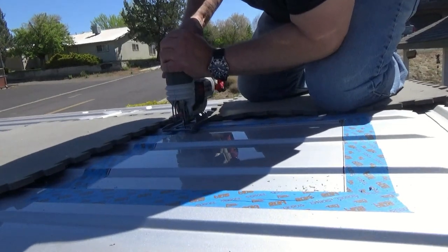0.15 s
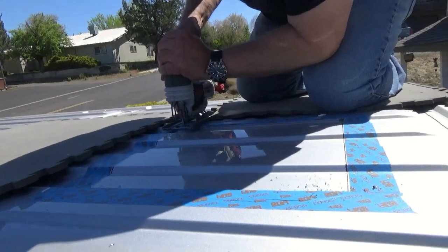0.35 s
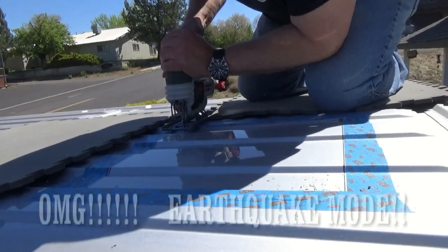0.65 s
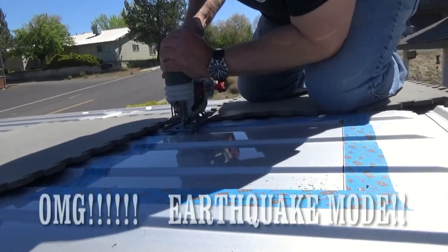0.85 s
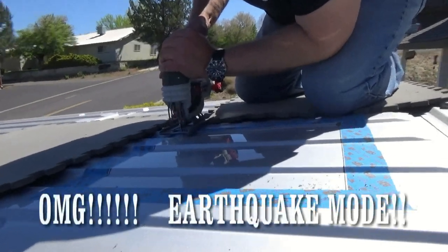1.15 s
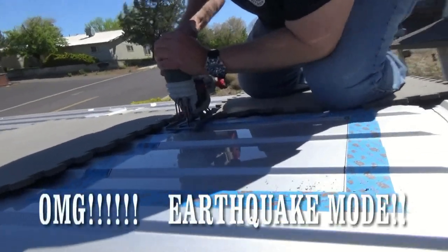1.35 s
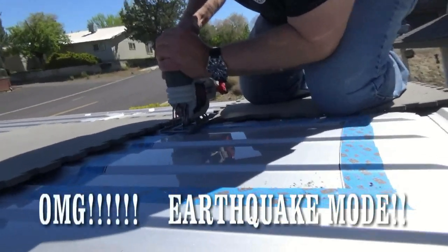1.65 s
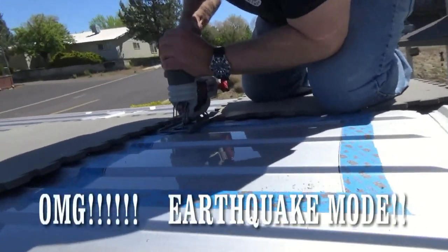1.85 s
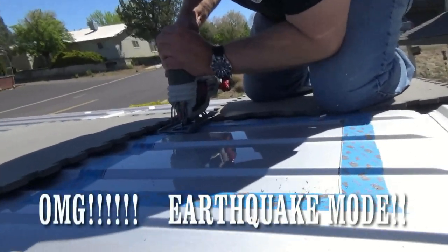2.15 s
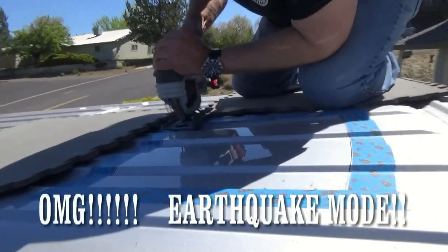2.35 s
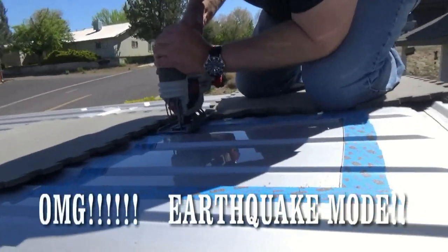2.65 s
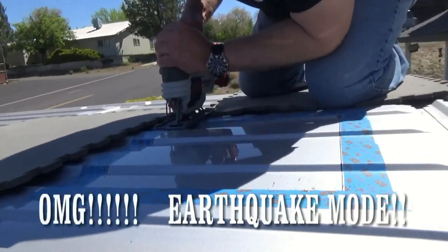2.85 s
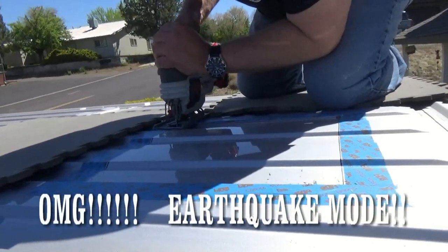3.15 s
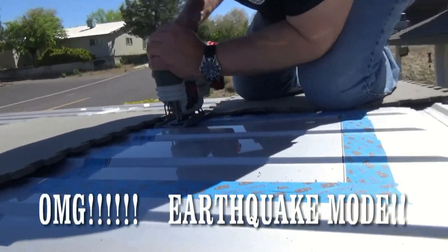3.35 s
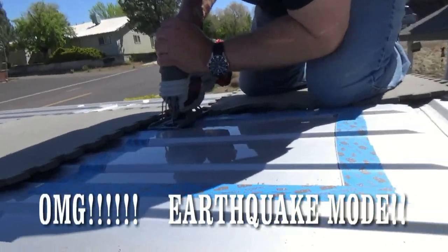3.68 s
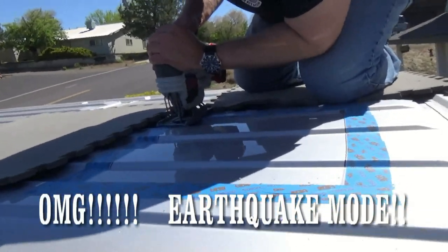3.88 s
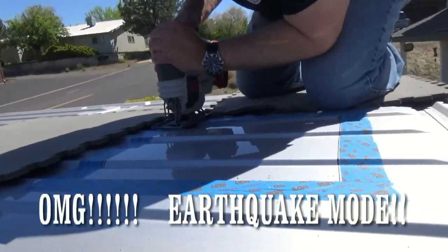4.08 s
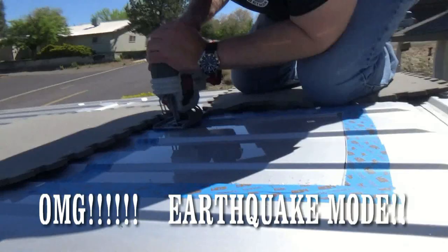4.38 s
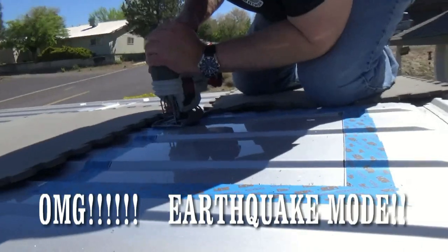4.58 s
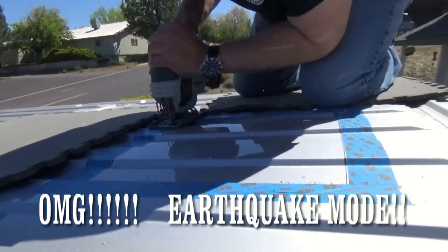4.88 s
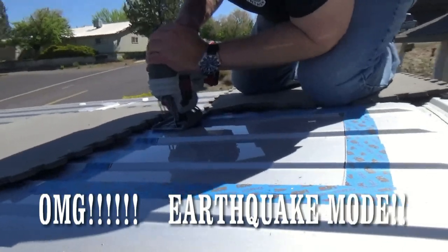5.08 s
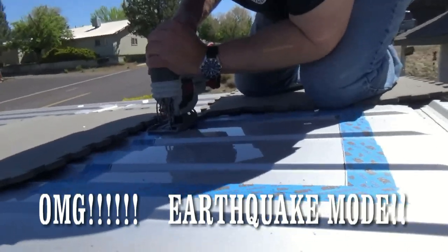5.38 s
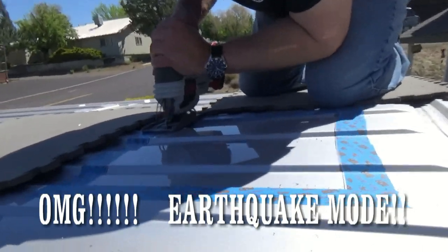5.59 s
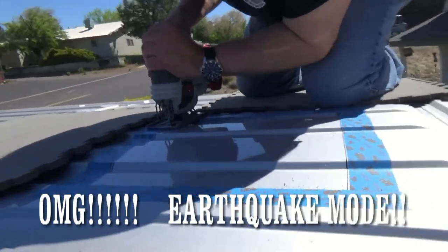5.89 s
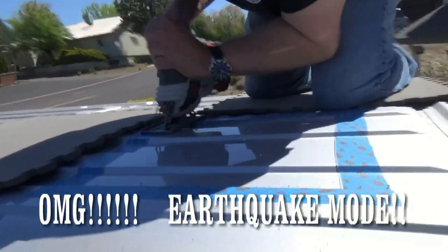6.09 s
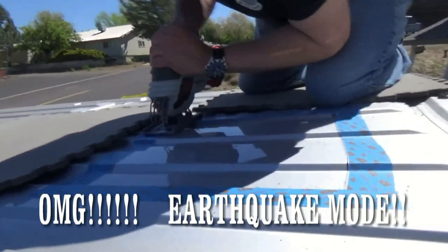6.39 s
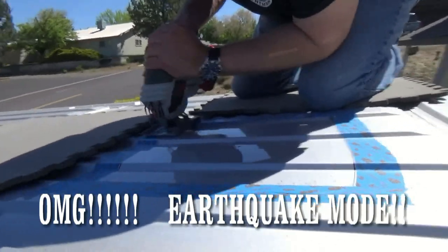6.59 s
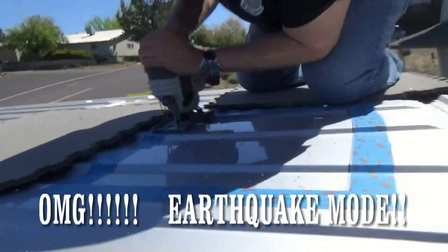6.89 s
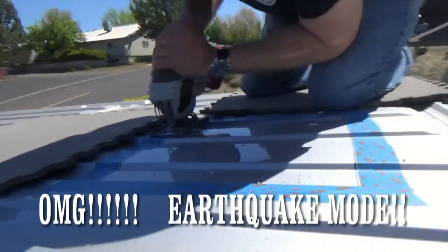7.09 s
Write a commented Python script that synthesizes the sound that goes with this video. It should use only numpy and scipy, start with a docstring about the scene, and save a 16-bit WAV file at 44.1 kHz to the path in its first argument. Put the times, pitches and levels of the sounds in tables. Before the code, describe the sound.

A jigsaw buzzes through thin sheet metal outdoors: two short yelping bursts, a long rasping cut, a brief pause, then another long cut.

```python
"""A jigsaw cuts a sheet-metal roof: two short bursts, a long cut, a pause, another long cut to the end.
Every blade stroke bites and rasps in nearly the same way: gritty noise, part of it repeated each stroke,
is shaped by the bite and coloured into rasp, sizzle, hiss, flap and boom. Gears whine on multiples of the
stroke rate, resonances squeal and the blade yelps as it catches. The switch clicks, a dull whirr stays
between the cuts, and the panel rings on briefly when the trigger is let go."""
import sys
import numpy as np
from scipy import signal
from scipy.fft import rfft, irfft, next_fast_len
from scipy.io import wavfile
from scipy.ndimage import uniform_filter1d

SR = 44100
rng = np.random.default_rng(int(sys.argv[2]) if len(sys.argv) > 2 else 0)


def transcribe(u):
    """Save the signal u as a 16-bit wav file named by the first command-line argument.

    u: samples, shape (n,) or (channels, n), limited to [-1, 1]; the rate is SR.
    q: integer samples, one column per channel.
    """
    v = np.clip(np.atleast_2d(u).T, -1, 1)
    q = np.round(v * 32767).astype(np.int16)
    wavfile.write(sys.argv[1], SR, q)


N = 319010
T = np.arange(N) / SR
FREE_STROKES_PER_S = 39.5  # unloaded blade

# Pulls of the trigger. Each row: click in seconds, click level in dB before its filter, blade bites in seconds,
# share of a stroke done at the bite, spin-up level in dB against the cut, trigger let go in seconds,
# blade stops in seconds, coasting level in dB.
CUTS = [(.0204, -15, .045, .3, -16, .16, .2, -42), (.3433, -18.5, .374, .3, -14, .5, .51, -45),
        (.618, -26, .652, .54, -6, 2.74, 2.955, -55), (3.1725, -36, 3.231, .2, -8, 7.3, 7.3, -54)]


def undb(db):
    """Amplitude factor of a level in dB."""
    return 10 ** (np.asarray(db) / 20)


def unit(x):
    """Scale to rms 1."""
    return x / np.sqrt(np.mean(x ** 2))


def colour(x, points):
    """Filter by (Hz, dB) points, joined over log frequency; rms 1."""
    size = next_fast_len(N)
    hz = np.arange(size // 2 + 1) * SR / size + 1
    point_hz, point_db = np.transpose(points)
    gain_db = np.interp(np.log(hz), np.log(point_hz), point_db, left=-80, right=-80)
    return unit(irfft(rfft(x, size) * undb(gain_db), size)[:N])


def walk(rate_hz):
    """Random levels held 1 / rate_hz s and slewed twice; spread near 1."""
    hold = int(SR / rate_hz)
    steps = np.repeat(rng.standard_normal(N // hold + 1), hold)
    return 1.25 * uniform_filter1d(uniform_filter1d(steps, hold), hold)[:N]


def resonate(x, hz, width_hz):
    """One resonance driven by x."""
    return signal.lfilter(*signal.iirpeak(hz, hz / width_hz, SR), x)


def swell(place, db, at):
    """Gain cycling once a stroke, +0.5 db at share `at` of the stroke and -1.5 db half a stroke away."""
    return undb(db * (np.cos(2 * np.pi * (place - at)) - .5))


def coasting():
    """A dull whirr of coloured noise that stays between the cuts, nearly the same on both sides."""
    # Each row: frequency in Hz, relative level in dB per Hz.
    coast = [(60, -12), (350, -10), (550, -9), (780, -9), (920, -2), (1130, -10), (1700, -13), (3600, -22),
             (15000, -37)]
    level_db = np.interp(T, [cut[-2] for cut in CUTS], [cut[-1] for cut in CUTS])
    mid, side = (colour(rng.standard_normal(N), coast) for _ in range(2))
    return undb(level_db + 2.5 * walk(27)) * (mid + 0.15 * side * np.array([[1], [-1]]))


def trigger():
    """Small plastic clicks of the switch: decaying noise, band-limited."""
    out = np.zeros(N)
    tick_s = np.arange(400) / SR
    for click_s, db, *_ in CUTS:
        i = int(click_s * SR)
        out[i:i + 400] += undb(db) * rng.standard_normal(400) * np.exp(-tick_s / 0.0014)
    return signal.sosfilt(signal.butter(2, [2600, 11000], "band", fs=SR, output="sos"), out)


def ring(x):
    """The panel rings on in decaying bands of noise, differently at each microphone."""
    # Each row: centre in Hz, decay by 60 dB in seconds, relative level in dB.
    ring_bands = [(416, 0.31, -12), (906, 0.22, -4), (3060, 0.12, -8.5), (5900, 0.26, -27),
                  (12100, 0.092, -38)]
    side_share = 0.64  # differs between the microphones
    t, tail = T[:SR // 2], 0
    for hz, t60_s, db in ring_bands:
        edges_hz = [hz / 2.18, min(hz * 2.06, .45 * SR)]
        band = signal.butter(3, edges_hz, "band", fs=SR, output="sos")
        noise = signal.sosfilt(band, rng.standard_normal((2, len(t))))
        decay = noise * np.exp(-np.log(1000) * t / t60_s)
        tail = tail + undb(db) * decay / np.sqrt(t60_s * SR / 14)
    stereo_tail = tail[0] + side_share * tail[1] * np.array([[1], [-1]])
    return signal.fftconvolve(x[None], stereo_tail, axes=1)[:, :N]


def motor():
    """Strokes per second, stroke count, strokes/s lost to load and to braking, and the on-off gain."""
    # Speed the motor can hold under the load of the cut. Each row: time in seconds, strokes per second.
    loaded_speed = [(0, 28), (.7, 34.09), (.95, 35.91), (1.07, 39.24), (1.57, 39.49), (1.9, 38.62),
                    (2.5, 39.01), (3.55, 38.75), (4.02, 39.28), (4.2, 38.13), (4.38, 34.45), (4.55, 37.9),
                    (4.72, 38.22), (4.97, 39.15), (5.15, 38.44), (5.35, 39.18), (6.0, 38.81), (6.12, 39.45),
                    (6.53, 39.13), (6.79, 38.35), (7.02, 36.31), (7.23, 37.17)]
    spin_s, spin_share = .06, .65  # share of speed reached at the bite
    brake_per_s2 = 88  # strokes/s lost per second
    switch_lag_s, stop_s = .018, .014
    click, _, bite, crank, spin_db, release, stop, _ = np.transpose(CUTS)
    start = click + switch_lag_s
    cut = np.clip(np.searchsorted(start, T) - 1, 0, None)
    loaded = np.interp(T, *np.transpose(loaded_speed))
    braked = brake_per_s2 * np.clip(T - release[cut], 0, None)
    spun = 1 - (1 - spin_share) * np.exp(-(T - bite[cut]) / spin_s)
    speed = np.clip(loaded * spun - braked, 1, None)
    turn = np.cumsum(speed) / SR
    # each cut bites at its own point of the stroke
    turn += cut + ((crank - np.interp(bite, T, turn)) % 1)[cut]
    run = 0
    for s, on, db, off in zip(start, bite, spin_db, stop):
        times = [s, s + 0.0064, on - .005, on, off, off + stop_s]
        run = run + np.interp(T, times, [0, undb(db), undb(db), 1, 1, 0])
    return speed, turn, FREE_STROKES_PER_S - loaded, np.minimum(braked, FREE_STROKES_PER_S), run


def teeth(turn, same, hold, grit_db):
    """Gritty tooth force: one part repeats each stroke and changes over `hold` strokes, the rest is new."""
    def grit(*shape):
        burst = np.minimum(rng.exponential(size=shape), 3.5)
        return rng.standard_normal(shape) * undb(grit_db * burst)
    size = 1024
    age, place = turn / hold, (turn % 1 * size).astype(int)
    row = age.astype(int)
    pattern = unit(grit(int(age.max()) + 2, size))
    fade = np.pi / 2 * (age % 1)
    again = np.cos(fade) * pattern[row, place] + np.sin(fade) * pattern[row + 1, place]
    same = np.clip(same, 0, 1)
    return np.sqrt(same) * again + np.sqrt(1 - same) * unit(grit(N))


def panel_flap(turn, same):
    """The sheet snaps once a stroke and shudders with the teeth."""
    # Each row: frequency in Hz, relative level in dB per Hz.
    flap = [(25, -38), (80, -22), (115, -7), (230, 0), (280, -16), (380, -28)]
    slap = unit(np.diff(np.floor(turn), prepend=0).clip(0, 1))
    return colour(slap + 0.66 * teeth(turn, same, 8.3, 0.6), flap)


def panel_boom(turn, same, bite_db):
    """The panel booms low under the tooth force, following the bite weakly."""
    # Each row: frequency in Hz, relative level in dB per Hz.
    boom = [(230, -20.5), (300, -4.5), (345, 3), (410, -7), (560, -9.5), (720, -7.5), (900, -10.5)]
    return colour(teeth(turn, same + 0.05, 14, 0.95) * undb(0.28 * bite_db + 1.6 * walk(12)), boom)


def blade_rasp(force, slack, bite_db, rough_db):
    """Tooth force shaped by the bite, which a slack panel smears."""
    # Each row: frequency in Hz, relative level in dB per Hz.
    rasp = [(250, -23.5), (500, -11.5), (760, -7.5), (1300, 1), (2200, -0.5), (3400, -1), (4500, -15),
            (6000, -16.5), (8000, -31)]
    sharpness = 0.49 * (2 - .3 * slack ** 2)
    return colour(force * undb(sharpness * bite_db + rough_db), rasp)


def chip_sizzle(turn, same, bite_db, rough_db):
    """Chips sizzle and excite the high modes of the blade."""
    # Each row: frequency in Hz, relative level in dB per Hz.
    sizzle = [(3500, 0), (4300, 10), (5200, 5), (6200, 3.5), (8300, 7), (9300, 7.5), (10500, -4)]
    # Each row: frequency in Hz, width in Hz, relative level in dB.
    blade_modes = [(6390, 110, -3.5), (6900, 100, 0), (7680, 130, -1.5), (8230, 160, 5.5),
                   (8570, 160, -6.5), (9420, 170, -1.5), (12900, 110, -1), (12400, 150, 4),
                   (14200, 350, 5.5)]
    blade_db = -8  # against the sizzle
    chips = teeth(turn, 0.18 * same, 4.6, 1.6) * undb(bite_db + 0.49 * rough_db)
    blade = 0
    for hz, width_hz, db in blade_modes:
        blade = blade + undb(db + 3.0 * walk(2.5)) * unit(resonate(chips, hz, width_hz))
    return colour(chips, sizzle) + undb(blade_db) * unit(blade)


def chip_hiss(turn, same, bite_db):
    """The finest, mostly unrepeated grit hisses with the bite."""
    # Each row: frequency in Hz, relative level in dB per Hz.
    hiss = [(8500, -3.5), (9800, -0.5), (11500, -3.5), (13500, -5), (15000, -13), (16500, -19)]
    return colour(teeth(turn, 0.13 * same, 2.2, 6.3) * undb(1.02 * bite_db), hiss)


def gear_whine(turn, place):
    """Gear tones through the housing; the load of each stroke swings the shaft ahead and behind."""
    # Each row: multiple of the stroke rate, relative level in dB.
    gears = [(24, -4), (28, -5), (34, 1), (39, -8), (42, 2), (45, -7)]
    # Gear housing. Each row: frequency in Hz, gain in dB.
    housing = [(500, -22), (850, -5), (1250, 0), (1750, 0), (2400, -12)]
    # Each row: time in seconds, share of the stroke at which the whine is loudest.
    gear_place = [(1.2, 0.72), (2.7, 0.39), (2.82, 0.057), (3.3, 0.13), (3.5, 0.39), (4.1, 0.25),
                  (5.0, 0.31)]
    swing_strokes, throb_db = .003, 8
    tones = 0
    for order, db in gears:
        swing_phase, tone_phase = rng.random(2)
        angle = turn + swing_strokes * np.sin(2 * np.pi * (turn + swing_phase))
        tones = tones + undb(db + 1.55 * walk(6.37)) * np.sin(2 * np.pi * (order * angle + tone_phase))
    loudest_at = np.interp(T, *np.transpose(gear_place))
    return colour(unit(tones), housing) * swell(place, throb_db, loudest_at)


def squeals(force, bogged, place):
    """The tooth force rings whichever resonance is free at the moment."""
    # Modes of sheet and blade, each free over one stretch. Each row: frequency in Hz, width in Hz,
    # level in dB before the swell, middle in seconds, half length in seconds,
    # share of the stroke where the swell peaks (dips if negative), swell in dB.
    modes = [(930, 160, -13.5, 4.4, 0.15, 0.14, -2), (800, 530, -10.5, .25, 0.21, 0.098, 13),
             (1134, 60, -18, 5.87, 0.79, 0.35, -4), (1330, 150, -15, 4.07, 0.93, 0.32, -5.5),
             (1916, 170, -12, 5.85, 0.88, 0.2, 11), (2683, 260, -8, 1.84, 0.88, 0.047, 3),
             (233, 15, -26, 5.2, 0.37, 0.36, 6), (3150, 160, -16.5, 6.1, 0.34, 0.11, 2),
             (2720, 290, -9, 4.68, 0.66, 0.36, 3.5), (2980, 33, -17, 3.53, 0.58, 0.26, 8),
             (3640, 160, -14.5, 5.8, 0.43, 0.2, 8), (4210, 69, -12.5, 5.2, 0.49, 0.063, 5),
             (5070, 200, -10.5, 3.88, 0.25, 0.022, 13), (5000, 92, -14.5, 4.96, 0.28, .05, 3),
             (6550, 110, -17.5, 4.9, 0.3, 0.042, 9.5), (2980, 300, -21, 2.02, 0.4, 0.64, 29),
             (2960, 500, -19.5, 6.95, 0.46, 0.49, 15)]
    screech_hz, screech_width_hz = 2670, 1600
    screech_db = -26.5  # at one stroke/s bogged down past the first

    def sing(x, hz, width_hz):
        tone = resonate(x, hz, width_hz)
        # divide by the running rms over 1/12 s, so each squeal keeps an even level
        return tone / np.sqrt(uniform_filter1d(tone ** 2, size=SR // 12))
    screech = sing(force, screech_hz, screech_width_hz)
    out = undb(screech_db) * np.clip(bogged - 1, 0, 4.5) * screech
    for hz, width_hz, db, middle_s, half_s, at, swell_db in modes:
        near = np.abs(T - middle_s) < 2 * half_s + .1
        stretch = np.exp(-((T[near] - middle_s) / half_s) ** 6)
        tone = sing(force[near], hz, width_hz) * swell(place[near], swell_db, at)
        out[near] += undb(db) * stretch * tone
    return out


def yelps():
    """Brief wavering tones as the blade catches, and the shape of the jolt that goes with each."""
    # Each row: start in seconds, frequency in Hz, length in seconds, peak level in dB against the cut.
    catches = [(.425, 1320, .025, 2), (.452, 1450, .05, 3), (.688, 1160, .016, 1), (.714, 1450, .022, 7),
               (.744, 1460, .016, 3), (.77, 1440, .024, 6), (.849, 1950, .007, 4), (.892, 2000, .01, 4),
               (.96, 1440, .024, 1), (.991, 1440, .022, 0), (1.02, 1460, .014, -2), (1.046, 1450, .02, -1),
               (2.858, 2050, .014, -2), (2.892, 2030, .016, -3), (2.938, 1670, .02, -2),
               (3.229, 2160, .016, -1), (4.303, 2750, .01, 1), (4.33, 2750, .012, 4), (4.36, 2800, .01, 2),
               (4.39, 2700, .008, 2), (4.418, 2750, .011, 4), (4.446, 2600, .01, 2), (.803, 2680, .009, 3)]
    wobble = 1 + .012 * walk(200)  # pitch scatter as a share
    tone, jolt = np.zeros(N), np.zeros(N)
    for start_s, hz, length_s, db in catches:
        i, size = int(start_s * SR), int(length_s * SR)
        shape = np.sqrt(np.sin(np.pi * (np.arange(size) / size) ** 0.63))
        cycles = hz * np.cumsum(wobble[i:i + size]) / SR
        tone[i:i + size] += undb(db) * shape * np.sin(2 * np.pi * cycles)
        jolt[i:i + size] = shape
    return tone, jolt


def saw():
    """All that sounds while the blade runs, driven by stroke position, bite and load."""
    # Course of the work. Each row: time in seconds, cut level in dB, slack of the panel 0-1, bite depth in dB
    # before stroke shaping, boom in dB against the cut level, rough scatter of the stroke timing in ms.
    work = [(.045, -19, 1, 7, -8, 0.66), (0.159, -18.5, 0.7, 4.5, -13.5, 0.63), (.2, -34.5, 0.1, -3, 1, .6),
            (.372, -18, 0.83, 2.5, -22, 0.59), (.515, -22.5, 0.53, 5, -1.5, 0.63),
            (.65, -25, 0.88, -2.5, -14, 0.77), (1.001, -21, 0.67, 1, -14, .6),
            (1.3, -17.5, 0.39, 5, -23, .22), (1.5, -17.5, 0.35, 5, -23, 0.13),
            (2.2, -17.5, 0.24, 6.5, -34, 0.043), (2.9, -17.5, 0.19, 5.5, -18.5, 0.055),
            (3.3, -17, 0.23, 7.5, -25, .09), (3.55, -17.5, 0.21, 7, -15, .16),
            (3.949, -18.5, 0.33, 7.5, -27, .1), (4.351, -17.5, 0.16, 5.5, -16, .25),
            (4.749, -17.5, 0.26, 8.5, -16.5, .1), (5.401, -18.5, 0.52, 5, -19.5, .16),
            (6.1, -18.5, 0.67, 9.5, -7.5, .12), (6.7, -15.5, 0.62, 7, -13.5, 0.19),
            (7.23, -16, 1, 8, -8, 0.79)]
    # Bite through one stroke. Each row: share of the stroke, multiplier of the bite depth.
    bite_shape = [(0, -0.61), (.2, -0.56), (.45, -0.75), (.62, -0.86), (.72, -1.61), (.9, 0.059),
                  (1, 0.061)]
    same_free, same_least, same_loss = 0.93, 0.27, 0.07  # likeness of strokes: full speed, floor, per stroke/s lost
    brake_depth_db = 0.4  # deeper bite per stroke/s braked away
    gear_brake_db, gear_bog_db = -.08, -2.2  # whine per stroke/s braked or bogged away
    bog_hiss_db = 0.07  # brighter chips per stroke/s bogged away
    chatter_db, yelp_knock_db = 3.5, 3  # unevenness of a rough cut; jump with each yelp

    speed, turn, bogged, braked, run = motor()
    same = np.clip(same_free - same_loss * (FREE_STROKES_PER_S - speed), same_least, 1)
    work_s, *columns = np.transpose(work)
    cut_db, slack, depth_db, boom_db, scatter_ms = (np.interp(T, work_s, c) for c in columns)

    def by_slack(taut_db, slack_db):
        return taut_db + slack * (slack_db - taut_db)
    # levels against the cut level, on a taut and on a slack panel
    flap_db, sizzle_db = by_slack(-39, -18), by_slack(-9, -3.5)
    hiss_db = by_slack(-17.5, -2.5) + bog_hiss_db * np.clip(bogged, 0, 5)
    gear_db = by_slack(3, -29) + gear_brake_db * braked + gear_bog_db * np.clip(bogged - 1, 0, 5)

    # strokes come a little early or late, which blurs the treble first
    turn = turn + scatter_ms / 1000 * speed * walk(45)
    place = (turn + .012 * walk(30)) % 1
    bite_db = (depth_db + brake_depth_db * braked) * np.interp(place, *np.transpose(bite_shape))
    bite_db += (.4 + 2.5 * (1 - same)) * walk(130)  # a rough cut knocks unevenly
    yelp, jolt = yelps()
    rough_db = chatter_db * (1 - same) * walk(45) + yelp_knock_db * jolt

    force = teeth(turn, same, 14, 0.84)
    mix = undb(-4.5) * blade_rasp(force, slack, bite_db, rough_db)
    mix += undb(flap_db) * panel_flap(turn, same)
    mix += undb(boom_db) * panel_boom(turn, same, bite_db)
    mix += undb(sizzle_db) * chip_sizzle(turn, same, bite_db, rough_db)
    mix += undb(hiss_db) * chip_hiss(turn, same, bite_db)
    mix += undb(gear_db) * gear_whine(turn, place)
    mix += squeals(force * undb(0.87 * rough_db), bogged, place) + yelp
    return run * undb(cut_db) * mix


def scene():
    """Saw and switch, the middle range panned slowly, with the panel's ring and the whirr."""
    # Each row: time in seconds, left minus right in dB.
    pan = [(3.3, -0.9), (4.3, -3), (5.6, 0.1)]
    # Edges of the panned middle range in Hz: lower, upper.
    pan_hz = [800, 5000]
    tool = saw() + trigger()
    pan_db = np.interp(T, *np.transpose(pan))
    middle = signal.lfilter(*signal.butter(1, pan_hz, "band", fs=SR), tool)
    panned = tool + middle * (undb(np.array([pan_db, -pan_db]) / 2) - 1)
    return panned + ring(tool) + coasting()


def record(dry):
    """Thin the deep bass, round the loudest peaks and cut the top."""
    top_hz = 15720
    thin = signal.sosfilt(signal.butter(2, 55, "high", fs=SR, output="sos"), dry)
    rounded = np.tanh(1.3 * thin) / 1.3
    return signal.sosfilt(signal.ellip(16, .2, 70, top_hz, fs=SR, output="sos"), rounded)


dry = scene()
out = record(dry)
transcribe(out)
```